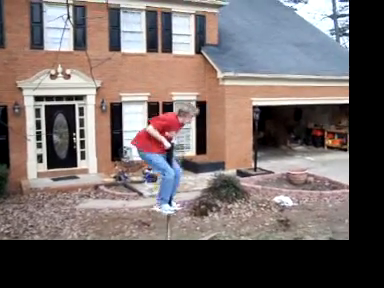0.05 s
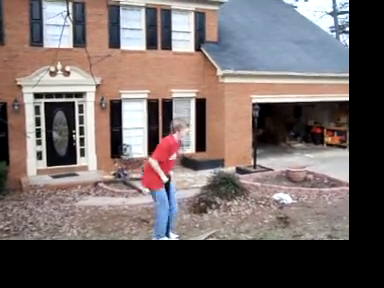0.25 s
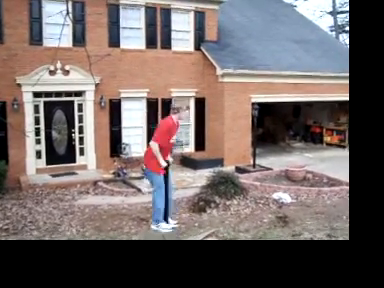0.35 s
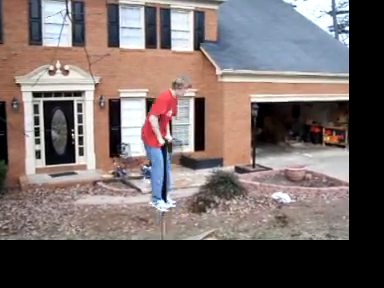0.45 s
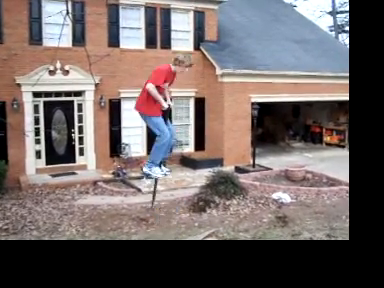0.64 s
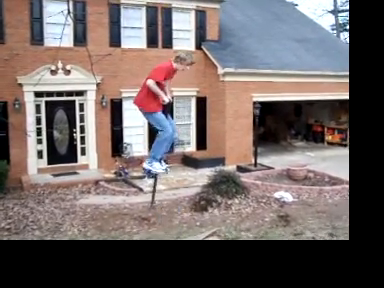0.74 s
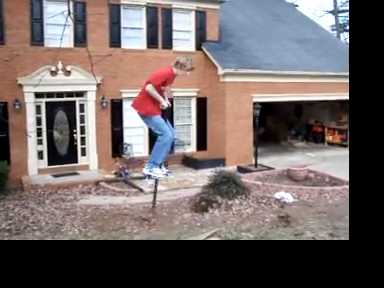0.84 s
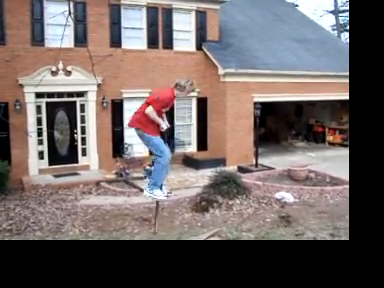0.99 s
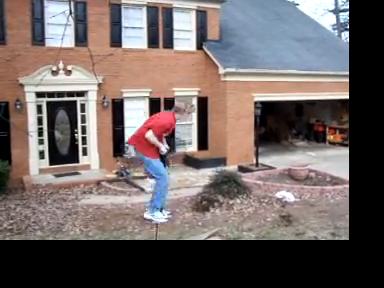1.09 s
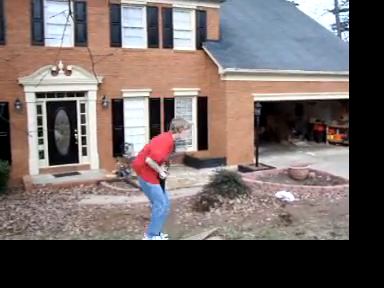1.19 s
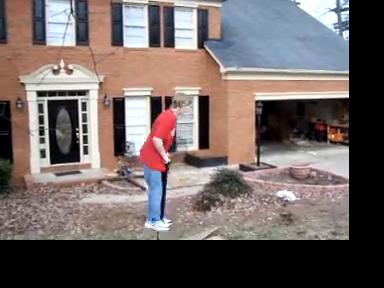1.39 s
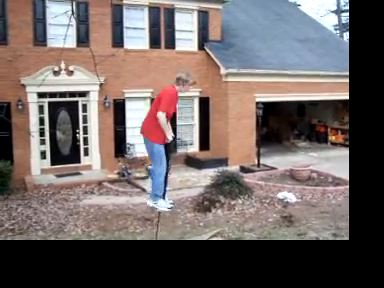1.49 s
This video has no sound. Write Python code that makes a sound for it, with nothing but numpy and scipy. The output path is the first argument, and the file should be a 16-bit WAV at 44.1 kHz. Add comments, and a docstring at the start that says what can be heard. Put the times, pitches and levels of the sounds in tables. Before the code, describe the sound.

A pogo stick bounces twice outdoors, with sharp metal clacks and deep thumps.

```python
"""A pogo stick bounces twice in a yard in front of a brick house, over a light breeze.
Each landing is a metal clack and a deep thump that overloads the microphone. The spring zings and
ticks; the shaft hisses as it is pushed out and, on the first lift-off, knocks against its stop.
The house front throws every knock back."""
import sys
import numpy as np
from scipy import signal
from scipy.fft import rfft, irfft
from scipy.io import wavfile

SR = 44100
rng = np.random.default_rng(int(sys.argv[2]) if len(sys.argv) > 2 else 0)


def pcm_store(signal):
    """Save signal as 16-bit PCM."""
    levels = np.round(np.clip(np.atleast_2d(signal), -1, 1) * 32767)
    wavfile.write(sys.argv[1], SR, levels.astype(np.int16).T)


N = 68355

# loaded stick modes: pitch_hz, level_db, t60_s
STICK_MODES = [(100.7, -21.5, 0.099), (153.5, -4, 0.042), (249.8, 7, 0.021), (312.3, 1.5, 0.039),
               (525, -14, 0.016), (707, -38, 0.039), (963, -20.5, 0.017)]
# steel tube modes: pitch_hz, level_db, t60_s
TUBE_MODES = [(900, -7, .04), (1250, 0, .04), (1660, 9, 0.046), (1760, 12, 0.031), (2420, -9, .06),
              (3040, -12, .07)]
THUMP_RISE_S, CLACK_RISE_S, GRIT_RISE_S = 0.00099, 0.00032, 0.00077


def knock(thump_db, pitch_ratio, damping, clack_db, clack_hz, grit_db, tube_db,
          spectrum, low_cut_hz, lag_s, clack_t60_s, grit_t60_s):
    """One impact: a metal clack, and the thump of the whole stick with a gritty burst."""
    t = np.arange(N // 3) / SR
    late = np.maximum(t - lag_s, 0)
    modes = [(hz * pitch_ratio, db, t60_s / damping) for hz, db, t60_s in STICK_MODES]
    thump = ring(modes, late) * (1 - np.exp(-late / THUMP_RISE_S))
    thump -= lowpass(thump, low_cut_hz, order=1)
    clack = 2 * ring([(clack_hz, clack_db, clack_t60_s)], t) + amp(tube_db) * ring(TUBE_MODES, t)
    clack *= 1 - np.exp(-t / CLACK_RISE_S)
    grit = 2 * noise(spectrum)[:len(t)] * fade(t, grit_t60_s)
    grit *= 1 - np.exp(-t / GRIT_RISE_S)
    return clack, amp(thump_db) * thump + amp(grit_db) * grit


# foot on ground: start_s, thump_db, pitch_ratio, damping, clack_db, clack_hz, grit_db, echo_db, tube_db
LANDINGS = [(0.2334, 10, 0.992, 0.77, 5, 4300, -13.5, -3.5, -27),
            (1.2468, 3, 1.06, 0.84, 1, 4340, -12.5, -1.5, -38)]
# shaft on stop: start_s, thump_db, pitch_ratio, damping, clack_db, clack_hz, grit_db, echo_db, tube_db
STOP_HITS = [(.546, -6, 0.93, 0.8, 1, 5010, -12, 2, -35)]
# grit under the foot: freq_hz, density_db
CRUNCH_SPECTRUM = [(100, -15), (500, 0.5), (900, 5), (1300, -4.5), (2500, -2.5), (4400, -5.5), (5500, -6.5),
                   (7000, -17.5), (9000, -36)]
# stop rattling in the tube: freq_hz, density_db
RATTLE_SPECTRUM = [(100, -13.5), (450, 2), (800, 11.5), (1000, -3.5), (1200, -13.5), (1650, 5.5),
                   (2050, -10), (2450, 0), (3000, -7.5), (4300, -3.5), (5200, -3.5), (6000, -10.5),
                   (7200, -16), (9000, -33)]
CLACK_OUTWARD_DB = -16


def bounces():
    """Foot and stop impacts: the direct sound and the share sent towards the house."""
    direct, outward = np.zeros((2, N))
    foot = dict(spectrum=CRUNCH_SPECTRUM, low_cut_hz=50, lag_s=0.000369,
                clack_t60_s=0.0031, grit_t60_s=0.048)
    stop = dict(spectrum=RATTLE_SPECTRUM, low_cut_hz=170, lag_s=0.00271,
                clack_t60_s=0.0043, grit_t60_s=0.023)
    for hits, contact in (LANDINGS, foot), (STOP_HITS, stop):
        for start_s, *strike, echo_db, tube_db in hits:
            clack, thud = knock(*strike, tube_db, **contact)
            add(direct, start_s, clack + thud)
            add(outward, start_s, amp(echo_db) * (amp(CLACK_OUTWARD_DB) * clack + thud))
    return direct, outward


# spring strokes: down_s, lowest_s, lift_s, rub_in_db, rub_out_db
STROKES = [(0.237, 0.39, .547, -42, -26.5), (1.248, 1.424, 1.58, -42, -29)]
# sliding friction: freq_hz, density_db
RUB_SPECTRUM = [(300, -23), (1500, -41), (2600, -6.5), (3600, -1.5), (5300, -1), (6400, -6), (7500, -14.5),
                (9000, -25.5)]
BRAKE_DB, SWELL_DB = 6, 24.5


def shaft():
    """The shaft rubs in its bushing, fading as the spring brakes it, swelling as it shoots out."""
    out = np.zeros(N)
    for down_s, lowest_s, lift_s, rub_in_db, rub_out_db in STROKES:
        going_in = np.linspace(0, 1, round((lowest_s - down_s) * SR))
        coming_out = np.linspace(0, 1, round((lift_s - lowest_s) * SR))
        level_db = np.concatenate([rub_in_db - BRAKE_DB * going_in ** 3,
                                   rub_out_db - SWELL_DB * (1 - coming_out) ** 1.55])
        rub = noise(RUB_SPECTRUM) * amp(1.5 * drift(rate_hz=250))
        add(out, down_s, rub[:len(level_db)] * amp(level_db))
    return out


# coil spring modes: pitch_hz, level_db, t60_s
COIL_MODES = [(4640, -44, .25), (6670, -39, 0.21), (6830, -45, 0.16)]
# coil on tube: start_s, level_db
COIL_TICKS = [(.3355, -29.5), (1.3064, -41), (1.3665, -31), (1.3728, -30.5), (1.3811, -41), (1.4216, -42)]


def spring():
    """The coil zings at each landing and ticks against the tube as it is squeezed."""
    out, t = np.zeros(N), np.arange(SR // 3) / SR
    for start_s, *_ in LANDINGS:
        add(out, start_s, ring(COIL_MODES, t))
    for start_s, level_db in COIL_TICKS:
        add(out, start_s, amp(level_db) * noise(RUB_SPECTRUM)[:len(t)] * fade(t, t60_s=0.014))
    return out


# wall reflections: delay_s, level_db
WALL_SLAPS = [(.0392, -21), (.025, -37.5), (.103, -37), (0.089, -38), (0.14, -33.5)]
# recess resonances: pitch_hz, width_hz, level_db
RECESS_MODES = [(229, 36, 0.5), (245.9, 4.6, -2)]
WALL_EDGE_HZ, WALL_TREBLE_DB = 245, 3.5
RECESS_DELAY_S = 0.0398
SCATTER_DELAY_S, SCATTER_DB, SCATTER_LOW_HZ, SCATTER_HIGH_HZ = 0.0386, -8, 545, 4600


def house(x):
    """The house front returns slaps, the boom of a recess and a short bright scatter."""
    out, t = np.zeros(N), np.arange(N // 10) / SR
    slap = lowpass(x, WALL_EDGE_HZ) + amp(WALL_TREBLE_DB) * x
    for delay_s, level_db in WALL_SLAPS:
        add(out, delay_s, amp(level_db) * slap)
    for pitch_hz, width_hz, level_db in RECESS_MODES:
        boom = signal.lfilter(*signal.iirpeak(pitch_hz, pitch_hz / width_hz, fs=SR), x)
        add(out, RECESS_DELAY_S, amp(level_db) * boom)
    taps = rng.standard_normal(len(t)) * fade(t, t60_s=0.052)
    low_cut = signal.butter(3, SCATTER_LOW_HZ, "high", fs=SR, output="sos")
    bright = signal.sosfilt(low_cut, lowpass(x, SCATTER_HIGH_HZ, order=1))
    scatter = signal.fftconvolve(bright, taps / np.linalg.norm(taps))
    add(out, SCATTER_DELAY_S, amp(SCATTER_DB) * scatter)
    return out


# outdoor tail colour: freq_hz, level_db
TAIL_SPECTRUM = [(60, -17), (130, -10.5), (245, -17.5), (330, -26), (450, -13), (900, -15.5), (2000, -25.5),
                 (4500, -17.5), (8000, -8)]
# outdoor tail decay: freq_hz, t60_s
TAIL_DECAY = [(100, 1), (250, 1), (1000, 0.6), (4000, 0.93), (8000, 0.46)]


def yard(x):
    """Trees and neighbouring walls return a thin tail, each band dying at its own speed."""
    hz, t, bands = signal.stft(rng.standard_normal(SR), SR, nperseg=512)
    onset = np.minimum(t / 0.01, 1)
    bands = bands * fade(t, read(TAIL_DECAY, hz)[:, None]) * onset
    norm = np.linalg.norm(signal.istft(bands, SR, nperseg=512)[1])
    bands *= amp(read(TAIL_SPECTRUM, hz))[:, None]
    tail = signal.istft(bands, SR, nperseg=512)[1] / norm
    return amp(-0.5) * signal.fftconvolve(x, tail)[:N]


# distant wash: freq_hz, density_db
AIR_SPECTRUM = [(25, -6), (80, -1), (160, -3), (260, -4), (400, -7), (560, -5), (800, 1.5), (1100, -2),
                (1400, -4.5), (2000, -6), (3200, -12.5), (5000, -24), (6500, -34.5), (8000, -40.5),
                (9000, -74)]
# wind rumble: freq_hz, density_db
WIND_SPECTRUM = [(20, -5), (50, -7.5), (78, 8), (115, -2.5), (250, -21), (600, -55)]
# wind strength: time_s, gain_db
GUSTS = [(0, 3.5), (0.299, -1), (.55, 9.5), (.85, -6), (1.03, -7), (1.2, 3.5), (1.55, 5)]
AIR_DB, WIND_DB = -33.5, -41.5


def breeze():
    """Distant outdoor wash and low wind gusting on the microphone."""
    gust_db = np.interp(np.arange(N) / SR, *np.transpose(GUSTS))
    wash = amp(AIR_DB) * noise(AIR_SPECTRUM) * amp(0.5 * drift(rate_hz=40))
    return wash + amp(WIND_DB + gust_db) * noise(WIND_SPECTRUM)


def amp(db):
    """Decibels to amplitude."""
    return 10 ** (np.asarray(db) / 20)


def unit(x):
    """Scales to rms 1."""
    return x / np.sqrt(np.mean(x ** 2) + 1e-20)


def read(points, hz):
    """Reads a table on a log-frequency axis."""
    freq_hz, value = np.transpose(points)
    return np.interp(np.log(hz + 1), np.log(freq_hz + 1), value)


def add(mix, start_s, sound):
    """Mixes a sound in at start_s."""
    part = mix[round(start_s * SR):][:len(sound)]
    part += sound[:len(part)]


def noise(spectrum):
    """Steady noise of a given colour."""
    gain = amp(read(spectrum, np.fft.rfftfreq(N, 1 / SR)))
    return unit(irfft(rfft(rng.standard_normal(N)) * gain, N))


def drift(rate_hz):
    """Random wavering."""
    gain = np.exp(-(np.fft.rfftfreq(N, 1 / SR) / rate_hz) ** 2)
    return unit(irfft(rfft(rng.standard_normal(N)) * gain, N))


def lowpass(x, hz, order=2):
    """Causal low-pass."""
    return signal.sosfilt(signal.butter(order, hz, fs=SR, output="sos"), x)


def fade(t, t60_s):
    """Falls 60 dB in t60_s."""
    return np.exp(-np.log(1000) * t / t60_s)


def ring(modes, t):
    """Sum of dying modes."""
    return sum(amp(db) * fade(t, t60_s) * np.sin(2 * np.pi * hz * t) for hz, db, t60_s in modes)


def scene():
    """The stick, its echoes and the breeze, in mono."""
    direct, outward = bounces()
    return (direct + house(outward) + yard(outward) + shaft() + spring() + breeze())[None]


THRESHOLD_DB, RELEASE_DB_PER_S, DUCK_DB_PER_DB = -8, 22, 0.15
CEILING, MIC_EDGE_HZ, OUTPUT_EDGE_HZ = 0.69, 8300, 16500


def record(dry):
    """Gain control dips after loud knocks; the input clips, is band-limited and clips again."""
    x = dry[0] - lowpass(dry[0], hz=33, order=1)
    power_db = 10 * np.log10(abs(lowpass(x ** 2, hz=5.2, order=1)) + 1e-12)
    release_db = np.arange(N) / SR * RELEASE_DB_PER_S
    held_db = np.maximum.accumulate(power_db + release_db) - release_db
    over_db = np.maximum(held_db - THRESHOLD_DB, 0)
    gain = amp(-DUCK_DB_PER_DB * lowpass(over_db, hz=24, order=1))
    x = np.clip(x * gain, -CEILING, CEILING)
    x = signal.oaconvolve(x, signal.firwin(61, MIC_EDGE_HZ, window=("kaiser", 5), fs=SR), "same")
    x = np.clip(x, -CEILING, CEILING)
    x = signal.oaconvolve(x, signal.firwin(511, OUTPUT_EDGE_HZ, window=("kaiser", 9), fs=SR), "same")
    return x[None]


dry = scene()
out = record(dry)
pcm_store(out)
```